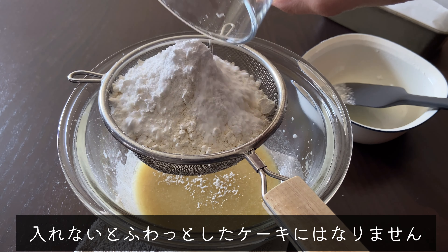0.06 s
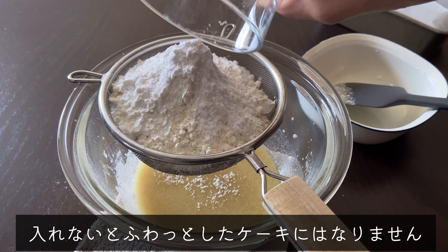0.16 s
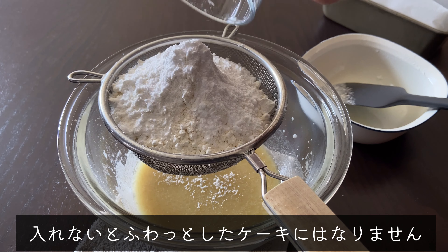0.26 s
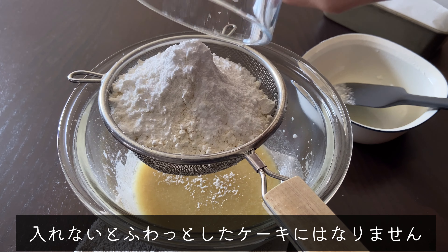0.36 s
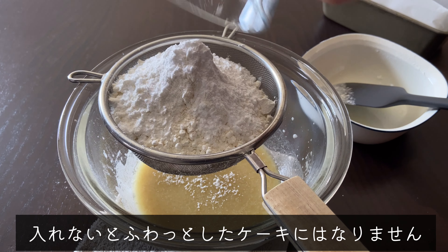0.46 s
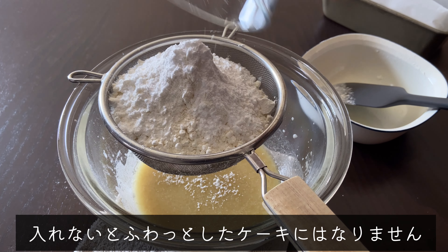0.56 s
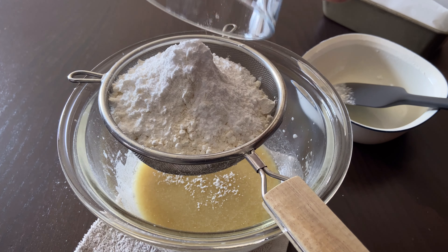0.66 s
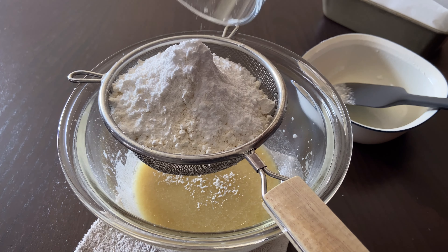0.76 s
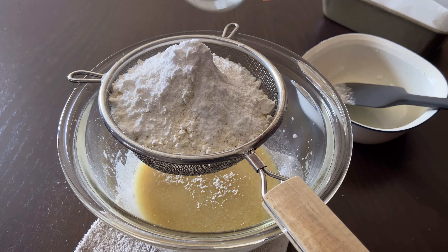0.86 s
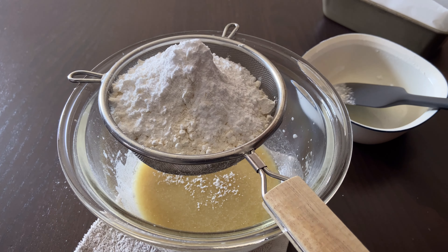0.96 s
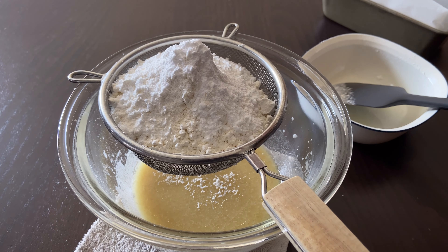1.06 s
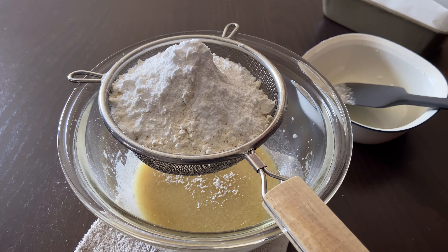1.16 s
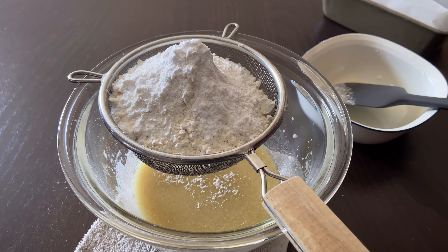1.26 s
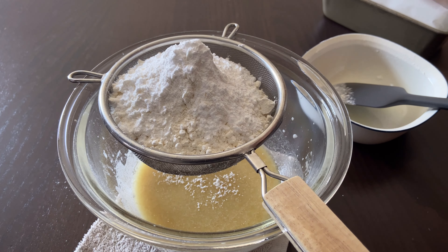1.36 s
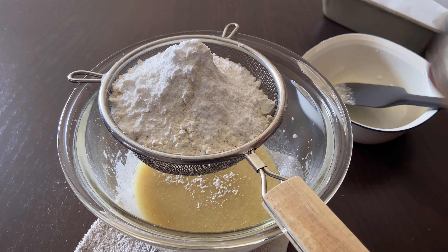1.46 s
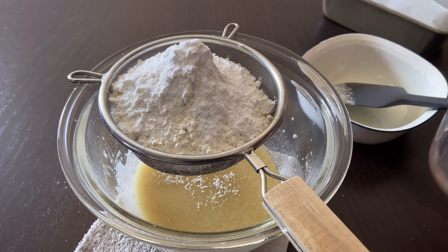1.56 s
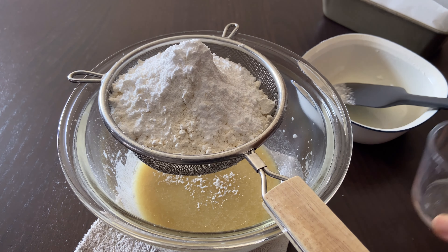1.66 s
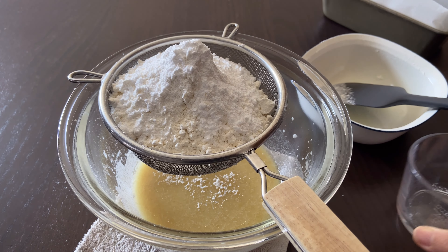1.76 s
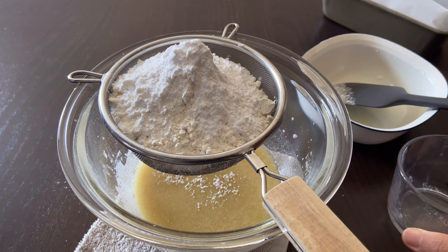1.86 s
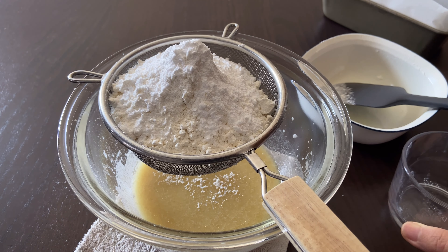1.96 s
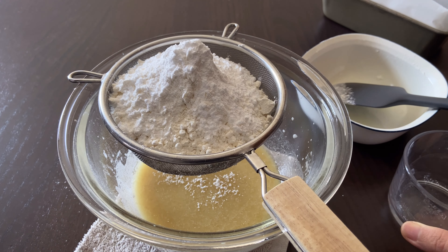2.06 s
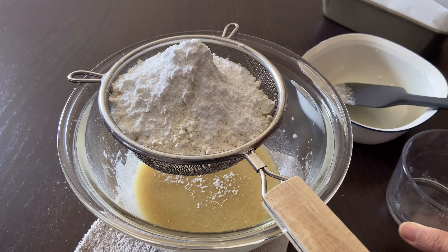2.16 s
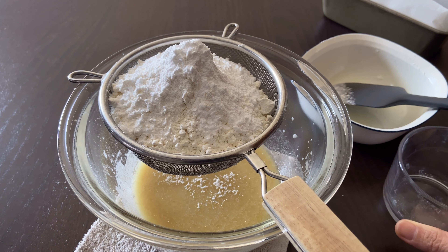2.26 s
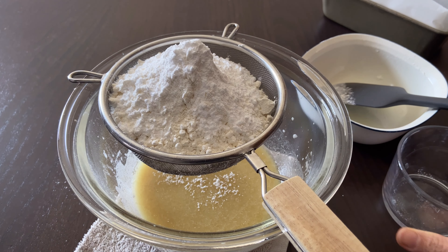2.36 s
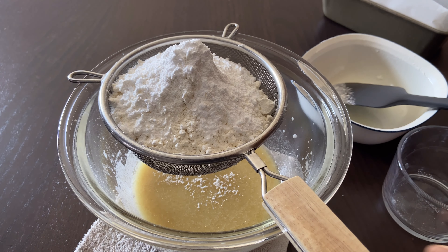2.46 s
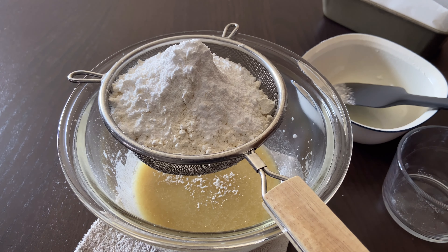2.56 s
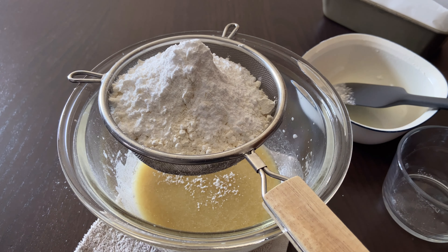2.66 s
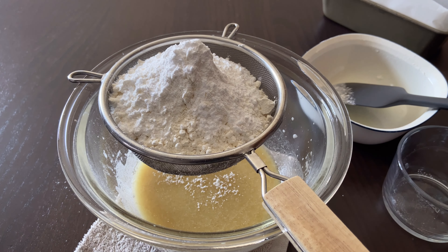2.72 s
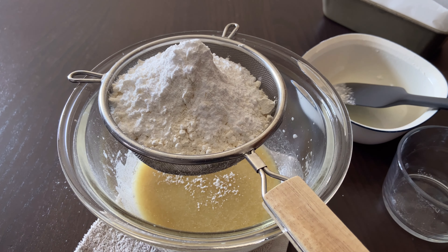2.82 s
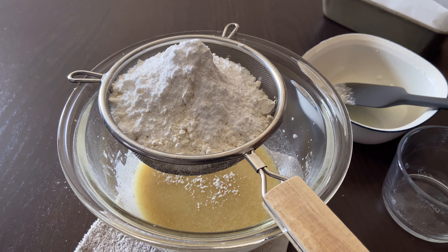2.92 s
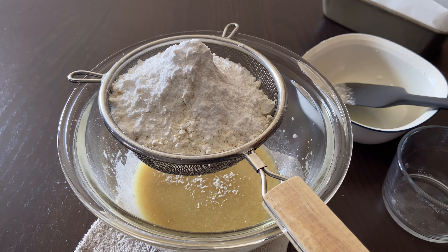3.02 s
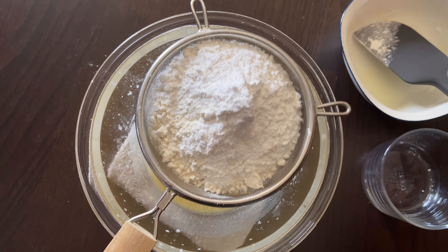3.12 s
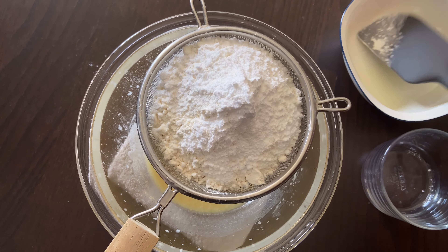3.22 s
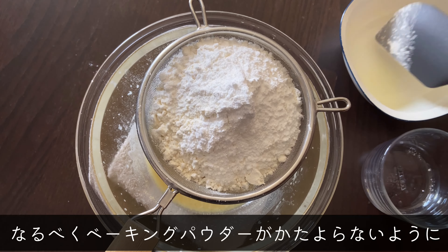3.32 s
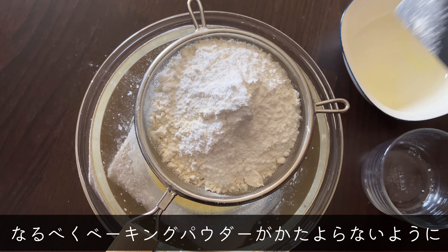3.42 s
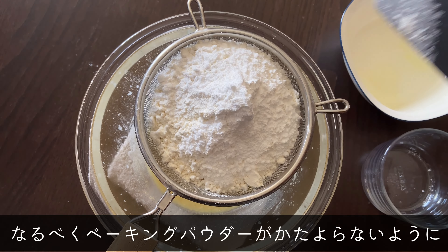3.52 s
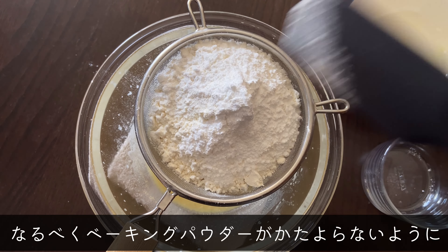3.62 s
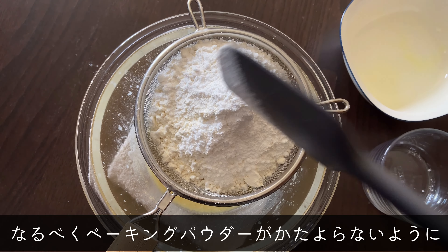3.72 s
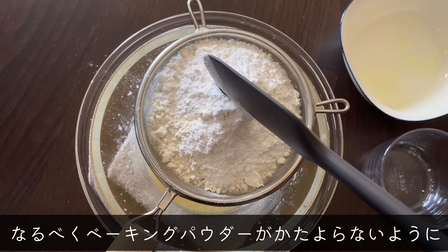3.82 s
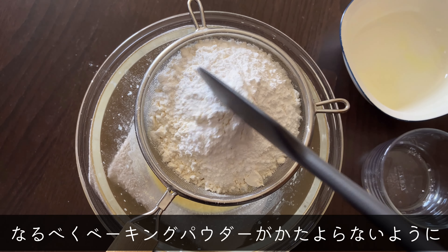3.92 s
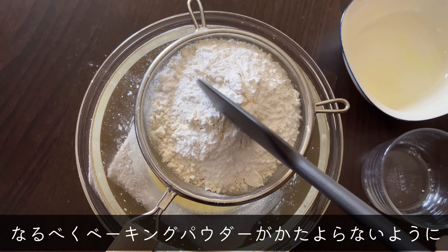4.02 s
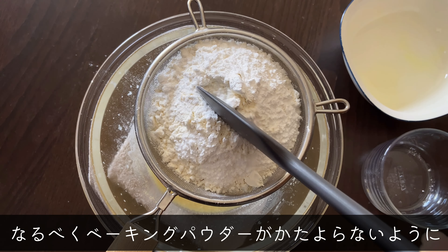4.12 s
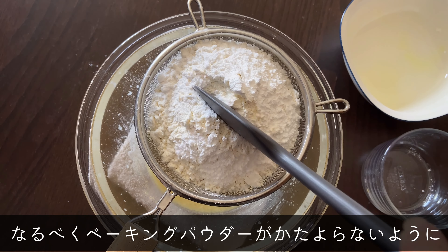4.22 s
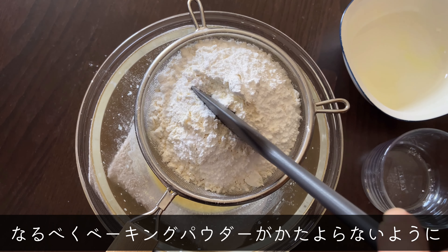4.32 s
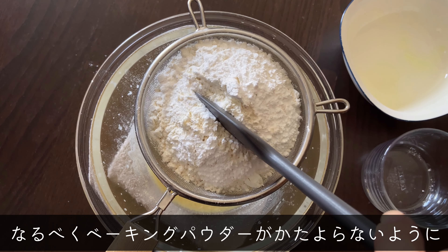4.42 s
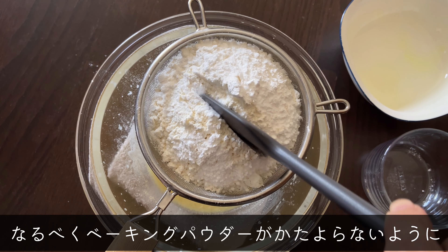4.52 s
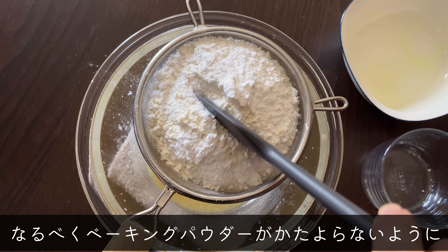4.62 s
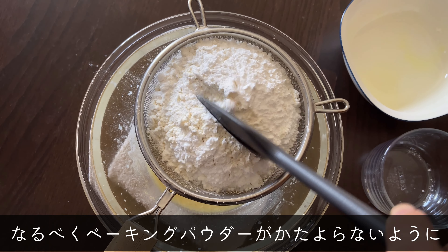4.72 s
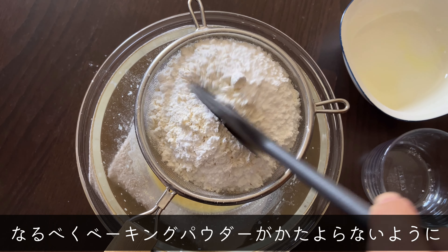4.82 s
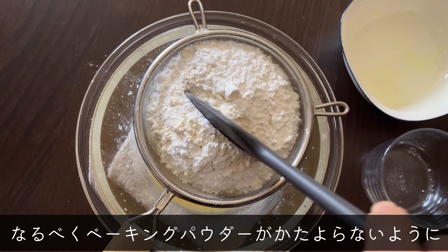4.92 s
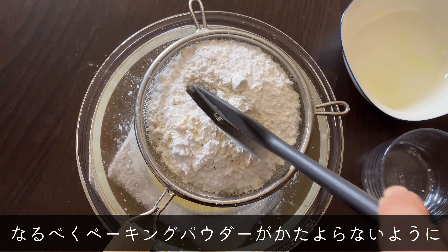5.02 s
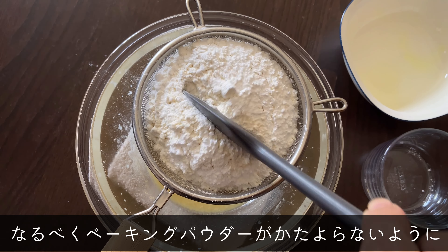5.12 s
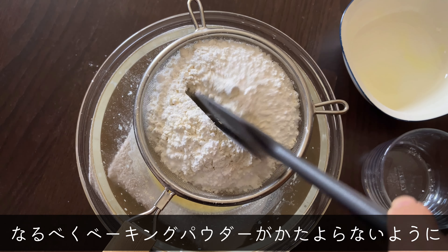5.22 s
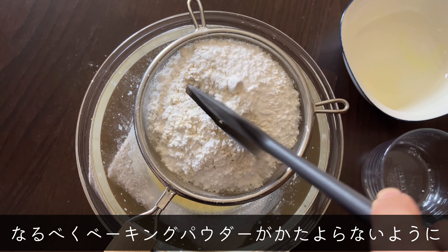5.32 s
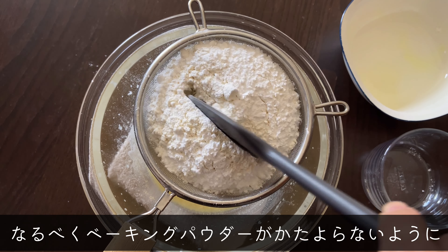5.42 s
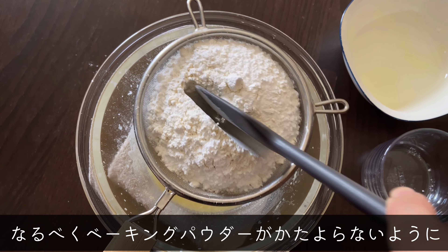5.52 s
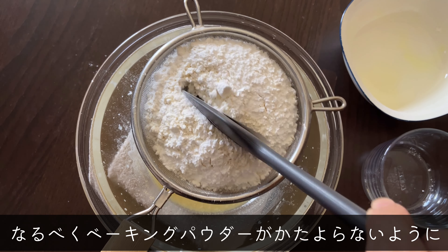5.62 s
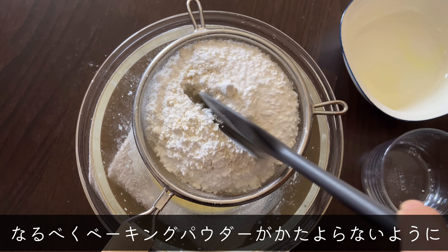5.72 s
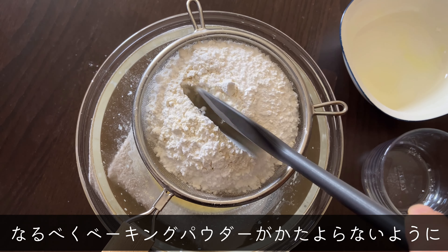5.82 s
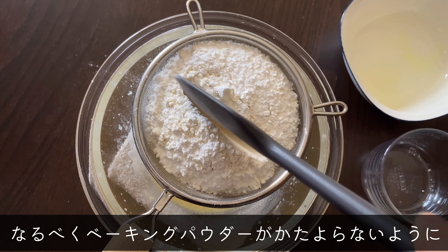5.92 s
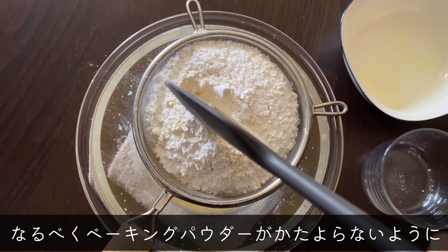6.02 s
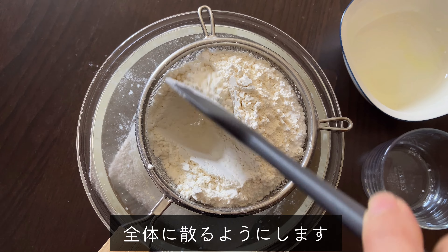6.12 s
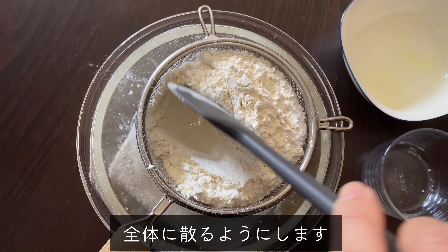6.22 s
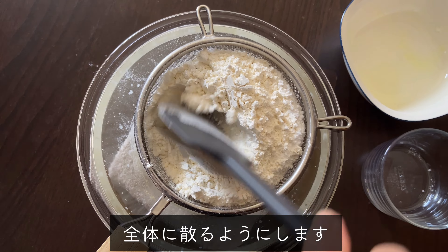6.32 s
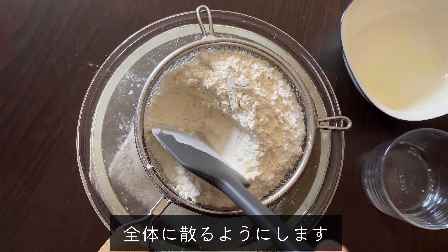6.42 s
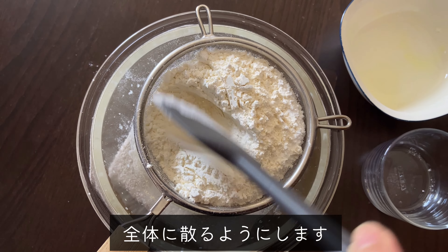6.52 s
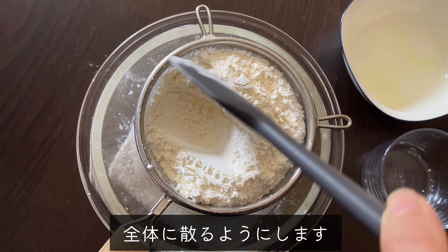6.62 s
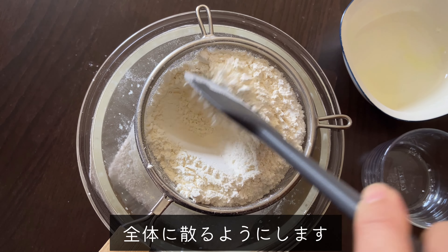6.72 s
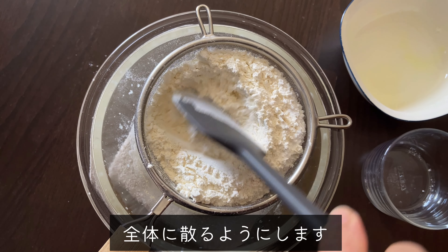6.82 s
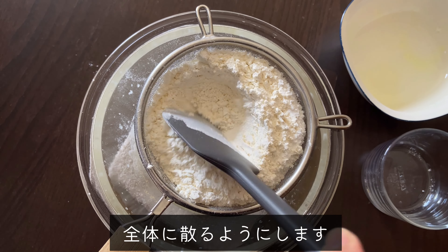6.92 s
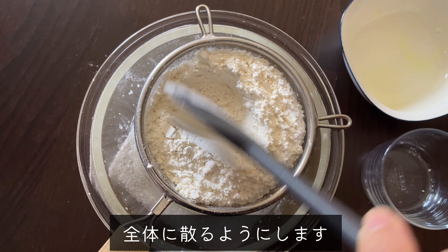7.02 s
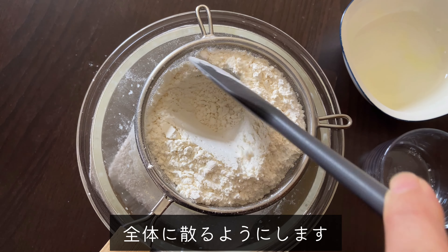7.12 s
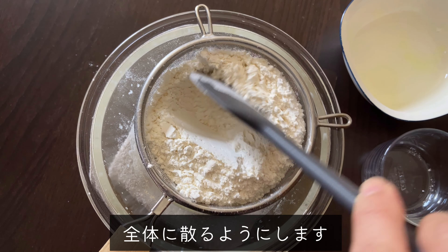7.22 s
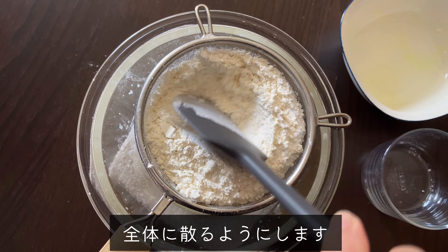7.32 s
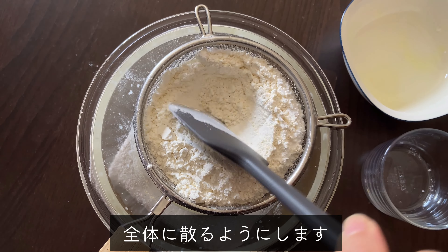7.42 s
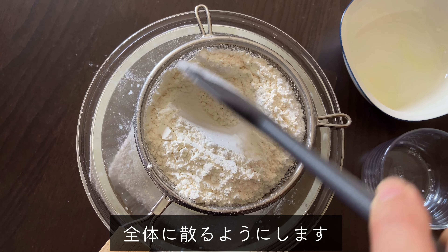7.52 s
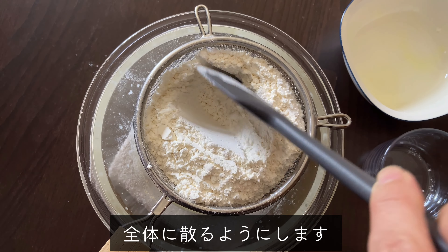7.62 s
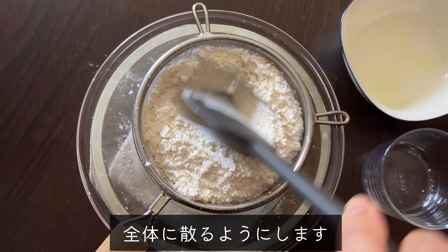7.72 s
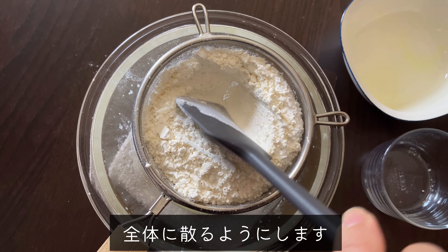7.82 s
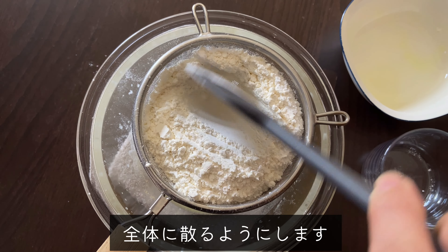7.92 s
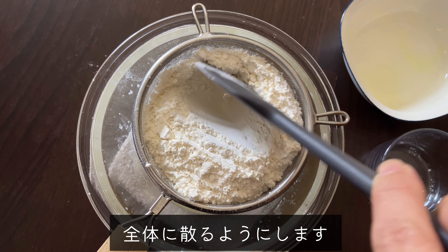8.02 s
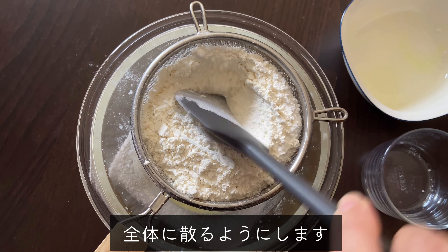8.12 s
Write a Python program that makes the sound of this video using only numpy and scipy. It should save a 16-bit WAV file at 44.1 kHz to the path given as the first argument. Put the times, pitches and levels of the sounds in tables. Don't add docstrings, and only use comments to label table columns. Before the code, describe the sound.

A quiet kitchen with steady low fridge hum and faint room rumble. A glass cup lands on a wooden table with a loud bouncing knock, then a second softer one. After a small shift in the background, flour rustles and the sieve bumps its glass bowl in dull clusters. Finally a spatula makes brief scratchy sweeps over the mesh. Close stereo microphone, short room reflections.

```python
import sys
import numpy as np
from scipy import signal
from scipy.fft import rfft, irfft, next_fast_len
from scipy.io import wavfile
from scipy.ndimage import uniform_filter1d

SR = 44100
rng = np.random.default_rng(int(sys.argv[2]) if len(sys.argv) > 2 else 0)


def magnitude_from_level(level_db):
    exponent = np.asarray(level_db, float) / 20
    return 10 ** exponent


def transcribe(u):
    v = np.clip(np.atleast_2d(u).T, -1, 1)
    q = np.round(v * 32767).astype(np.int16)
    wavfile.write(sys.argv[1], SR, q)


N = 360297
T = np.arange(N) / SR
HALVES = np.array([[.5], [-.5]])
OPPOSED = np.array([[1], [-1]])
RISE_S = .001


def rms_one(x):
    return x / np.sqrt(np.mean(x ** 2) + 1e-20)


def at_hz(points, hz):
    return np.interp(np.log(hz), np.log(np.array(points)[:, 0]), np.array(points)[:, 1])


def band(x, low_hz, high_hz):
    edges = [low_hz, min(high_hz, .45 * SR)]
    return signal.sosfilt(signal.butter(2, edges, "band", fs=SR, output="sos"), x)


def ring(clicks, hz, t60):
    r, w = magnitude_from_level(-60 / (t60 * SR)), 2 * np.pi * hz / SR
    return signal.lfilter([0, np.sin(w)], [1, -2 * r * np.cos(w), r * r], clicks + 1e-18)


def swell(rise_s, hz):
    t = T[:SR // 8]
    return t / rise_s * np.exp(1 - t / rise_s) * np.sin(2 * np.pi * hz * t)


def strike(out, s, hit):
    i = round(s * SR)
    out[:, i:i + hit.shape[-1]] += hit


def bursts(rows, sag_db_per_s=0):
    out, edge_db = np.zeros(N), 30
    for s, top_db, *lengths in rows:
        rise, hold, fall = np.maximum(lengths, 1e-4)
        end_db = top_db - sag_db_per_s * hold
        part = slice(int((s - rise) * SR), int((s + hold + fall) * SR))
        corners_s = [s - rise, s, s + hold, s + hold + fall]
        out[part] += magnitude_from_level(np.interp(T[part], corners_s, [top_db - edge_db, top_db, end_db, end_db - edge_db]))
    return out


# (frequency [Hz], left-right correlation [-1 to 1])
LIKENESS = [(60, 0.63), (95, 0.81), (150, 1), (240, 0.45), (370, 0.68), (590, -0.22), (930, -0.078),
            (1460, -0.18), (2300, 0.52), (3640, 0.15), (5740, 0.57), (9050, -0.82), (14300, 0.81)]
# (frequency [Hz], left minus right [dB])
TILT = [(60, 1.5), (180, -3), (540, -1), (1600, -3.5), (4780, -5.5), (14300, 0.5)]


def diffuse(size, shape, low_hz=22, high_hz=16000, alike=None):
    out, white = 0, rng.standard_normal((2, 2, size))
    edges = low_hz * 2 ** np.arange(0, np.log2(high_hz / low_hz) + .2, 1 / 3)
    for k, (low, high) in enumerate(zip(edges, edges[1:])):
        mid, side = band(white[k % 2], low, high)
        hz = np.sqrt(low * high)
        c = np.clip(at_hz(LIKENESS, hz) if alike is None else alike, -1, 1)
        pair = np.sqrt(1 + c) * mid + np.sqrt(1 - c) * side * OPPOSED
        out = out + shape(hz) * magnitude_from_level(at_hz(TILT, hz) * HALVES) * pair
    return out


def grains(per_s, spread_db):
    sizes = magnitude_from_level(spread_db * np.minimum(rng.exponential(1, N), 4)) * rng.choice([-1, 1], N)
    return rms_one(sizes * (rng.random(N) < per_s / SR))


def colour(x, spectrum):
    size = next_fast_len(N)
    hz = np.maximum(np.arange(size // 2 + 1) * SR / size, 1)
    return rms_one(irfft(rfft(x, size) * magnitude_from_level(at_hz(spectrum, hz)), size)[:N])


# (start [s], compressor speed [turns/s], hum phase [rad],
# hum lag of the left [rad], hum left minus right [dB])
VIEWS = [
    (0, 134.13, -.1, .59, .4),
    (3.096, 134.75, 2.2, .26, 1.8),
    (6.095, 135.275, -.4, .26, 1.7),
]


def view_index():
    return np.searchsorted(np.array(VIEWS)[:, 0], T, "right") - 1


# (frequency [Hz], level [dB rms])
HUM = [
    (99.96, -42),
    (199.92, -61.5),
]


def mains_hum():
    _, _, phase, lag, tilt_db = np.array(VIEWS)[view_index()].T
    phase = uniform_filter1d(phase, size=4)
    out = 0
    for k, (hz, level_db) in enumerate(HUM):
        tone = np.cos(2 * np.pi * hz * T + phase - HALVES * lag)
        out = out + magnitude_from_level(level_db + HALVES * tilt_db * (-1) ** k) * tone
    return np.sqrt(2) * out


# (multiple of turns, left minus right [dB], lag of the left [rad],
# level in each of the three views [dB rms])
WHINE = [(5.17, -4.5, 2.29, -68.5, -61.5, -60), (10, -1.5, 4.7, -101, -96, -85),
         (15, 1, 1.4, -84, -88.5, -92.5), (24, -3.5, 1.4, -87, -86.5, -78.5),
         (20, -7.5, 2.2, -102, -85, -83.5), (23, -5, 1.3, -91, -85, -90),
         (25, -4.5, 1.3, -101.5, -88, -93.5), (28, -6, 1.5, -104, -89.5, -100)]


def compressor_whine():
    view, out = view_index(), 0
    turns = np.array(VIEWS)[view, 1]
    wobble = signal.lfilter([1], [1, -.9999], rng.standard_normal(N)) * 0.004
    for multiple, pan_db, late, *level_db in WHINE:
        turn = 2 * np.pi * round(multiple) * turns * T + wobble * multiple / 5
        out = out + magnitude_from_level(np.array(level_db))[view] * np.cos(turn - HALVES * late) * magnitude_from_level(HALVES * pan_db)
    return np.sqrt(2) * out


# (frequency [Hz], width [Hz], level in each of the three views [dB rms])
CASING = [(499, 49, -71, -67.5, -68), (1104, 70, -80.5, -72.5, -73.5), (1830, 88, -82.5, -76.5, -79.5),
          (3280, 490, -100, -83.5, -95)]


def fan():
    view, white, out = view_index(), rng.standard_normal((2, N)), 0
    for hz, width, *level_db in CASING:
        out = out + magnitude_from_level(np.array(level_db))[view] * rms_one(band(white, hz - width / 2, hz + width / 2))
    return out


# (frequency [Hz], density [dB per Hz])
AIR = [(15, -57.5), (25, -44.5), (49, -11.5), (77, -8.5), (106, -5), (162, -17.5), (276, -23), (666, -32),
       (1000, -35), (1520, -44), (3130, -51), (7170, -57.5), (9500, -62.5), (13000, -61)]


def air():
    left, right = rms_one(diffuse(N, lambda hz: magnitude_from_level(at_hz(AIR, hz))))
    mid = signal.sosfilt(signal.cheby2(12, 30, 14100, fs=SR, output="sos"), left + right)
    side = signal.sosfilt(signal.cheby2(6, 20, 15000, fs=SR, output="sos"), left - right)
    return magnitude_from_level(-48.5) * (mid + side * OPPOSED) / 2


# (time [s], gain [dB])
GAIN = [(0, -1.5), (3.09, 0), (3.1, -8), (3.3, -8.5), (3.42, -3), (4.0, -1), (5.0, 0), (6.09, -1),
        (6.1, -1), (8.17, 0)]


def gain_control():
    return magnitude_from_level(np.interp(T, *np.transpose(GAIN)))


# (time [s], level [dB], rise [s], hold [s], fall [s])
RUBS = [(0.8, -68, .06, .005, 0.18), (1.292, -66, 0.054, .005, 0.029), (1.34, -70, .02, 0.0046, 0.041),
        (7.493, -68, .012, .004, .025), (7.617, -62, 0.014, 0.007, 0.029),
        (7.925, -65, 0.0092, 0.0055, 0.033), (2.254, -73, 0.076, 0.048, .025), (2.852, -71, 1, .005, .1),
        (2.966, -71, 0.095, .005, 0.023), (3.098, -56.5, 0.012, 0.28, .16), (3.25, -72, .25, 0.017, 0.3),
        (3.594, -61.5, .006, .004, 0.081), (3.645, -57.5, 0.004, 0.0043, 0.17),
        (3.794, -61, .005, 0.063, 0.18), (5.084, -56.5, 0.028, .002, 0.022), (5.48, -70, .01, .002, 0.03),
        (5.57, -66, 0.098, 0.0027, .03), (5.7, -69, 0.54, 0.016, .01), (8.168, -59, 0.0071, 0.0019, 0.011)]
# (time [s], level [dB], rise [s], hold [s], fall [s])
HISSES = [(0.498, -82, .06, .005, 0.23), (0.894, -79, 0.14, .005, 0.068), (1.25, -76, 0.41, 0.046, 0.19),
          (1.774, -69.5, 0.23, 0.0055, 0.069), (1.869, -74, 0.019, 0.00084, 0.0011),
          (2.254, -87, 0.14, 0.011, .13), (2.432, -74, 0.13, 0.0042, 0.14), (2.72, -77.5, .6, 0.32, 0.66),
          (3.096, -68.5, 0.004, .12, 0.21), (3.398, -72, 0.17, .003, .04), (3.634, -85.5, 0.54, .003, 0.27),
          (3.8, -77, 0.03, .02, .1), (5.062, -83, .09, 0.024, 0.03), (5.534, -68, 0.027, .003, 0.046),
          (5.6, -77, 0.038, .01, 0.27)]
# (frequency [Hz], density [dB per Hz])
SLIDE = [(180, -30), (300, 5.5), (542, 0), (684, -5), (852, -3), (1140, -4), (3500, -12), (8000, -22.5),
         (10400, -66.5), (17600, -120)]


def rustle():
    sag_db_per_s = 25.5
    body = rms_one(diffuse(N, lambda hz: magnitude_from_level(at_hz(SLIDE, hz)), low_hz=300, high_hz=9000))
    hiss = rms_one(diffuse(N, lambda hz: 1, low_hz=10500, high_hz=17000, alike=0.1))
    hiss_gain = bursts(HISSES, sag_db_per_s) + powder_gain()
    return magnitude_from_level(-1.0) * bursts(RUBS, sag_db_per_s) * body + magnitude_from_level(2.0) * hiss_gain * hiss


# (time [s], level [dB], frequency [Hz])
PINGS = [(1.341, -67, 4230), (3.592, -67, 2570), (3.596, -76, 4070), (3.646, -58.5, 3010),
         (3.662, -65, 2740), (3.793, -67, 3830), (3.795, -69, 2970), (3.806, -71, 2920), (3.825, -61, 3040),
         (3.834, -65, 3030)]


def pings():
    out = np.zeros((2, N + SR))
    for s, ping_db, hz in PINGS:
        hit = swell(0.0016, hz) + .6 * swell(.0007, 1.0 * hz) + .4 * swell(.0006, 1.3 * hz)
        strike(out, s, magnitude_from_level(ping_db + np.array([[-3], [3]])) * hit)
    return out[:, :N]


# (frequency [Hz], t60 [s])
ROOM_T60 = [(60, 0.39), (300, 0.35), (1000, 0.23), (3000, 0.22), (7000, 0.16), (15000, 0.2)]


def room(x):
    t = T[:SR // 2]
    tail = diffuse(len(t), lambda hz: magnitude_from_level(-60 * t / at_hz(ROOM_T60, hz))) * np.minimum(t / 0.0018, 1)
    return signal.fftconvolve(x[None], tail / np.sqrt(np.sum(tail ** 2) / 2), axes=1)[:, :N]


SECOND_S = 2.1

TABLE_HZ = [120, 165, 235, 308, 355, 395, 468, 534, 587, 631, 694, 753, 852, 985, 1043, 497, 1217, 1341,
            1453, 1616, 2130, 2480, 2950, 4200, 4900]
# (level [dB], t60 [s], change at the second landing [dB])
TABLE = [(-7.5, 0.68, 2.5), (-16, 0.94, -2), (-3.5, 0.17, 0), (-4.5, 0.23, -7.5), (-12, 0.097, 4.5),
         (-32, 0.43, 9), (3.5, 0.062, 0), (-3.5, 0.048, 7), (-29.5, 0.23, 2), (-18.5, 0.24, -2),
         (-3, 0.19, -18), (-7, 0.14, -3.5), (-3, 0.067, 1.2), (-11.5, 0.15, 3.5), (-14, 0.23, 3),
         (-31.5, 0.16, 16.5), (-37, 0.18, 5), (-6, 0.049, -1.5), (-21.5, 0.11, 1), (-29, 0.11, 3),
         (-39, 0.12, 3), (-26, 0.087, 4), (-33.5, 0.13, 8.5), (-48, .18, 2), (-54, .18, -3)]


def table_modes(s, at, peak_db, bright_db, size):
    out = np.zeros((2, size))
    luck_db = rng.standard_normal((len(at), len(TABLE)))
    for k, (hz, (level_db, t60, second_db)) in enumerate(zip(TABLE_HZ, TABLE)):
        hit_db = peak_db + level_db + second_db * (s > SECOND_S) + luck_db[:, k]
        clicks = np.zeros(size)
        clicks[at] = magnitude_from_level(hit_db + (bright_db + 27.5) * (hz > 2000)) * (-1) ** k
        mode = ring(clicks, hz, .5 * t60)
        lag = np.arccos(np.clip(at_hz(LIKENESS, hz), -1, 1)) * min(hz / 480, .9)
        out += [mode, magnitude_from_level(2.0) * np.roll(mode, round(lag * SR / (2 * np.pi * hz)))]
    return out


# (frequency [Hz], density [dB per Hz])
KNOCK = [(53, -35), (90, 12.5), (467, -4.5), (542, -17), (698, -3.5), (809, -12.5), (1340, -13.5),
         (1730, -32), (3130, -44), (8990, -77), (14000, -52.5)]
# (frequency [Hz], t60 [s])
KNOCK_T60 = [(100, 0.12), (500, 0.14), (1500, 0.16), (4000, 0.11), (12000, 0.11)]


def board_knock(clicks, crack):
    t, size = T[:SR // 3], clicks.shape[1]
    board = diffuse(len(t), lambda hz: magnitude_from_level(at_hz(KNOCK, hz) - 60 * t / at_hz(KNOCK_T60, hz)), low_hz=88.0)
    board = board / np.abs(board).max() * np.minimum(t / 0.0011, 1)
    low = signal.fftconvolve(band(clicks, 45, 1700), board, axes=1)[:, :size]
    high = signal.fftconvolve(band(crack, 1650, 6400), board, axes=1)[:, :size]
    snap = band(rng.standard_normal((2, len(t))), 8450, 12500) * np.exp(-t / 0.0051)
    high = high + magnitude_from_level(-39.0) * signal.fftconvolve(crack, snap, axes=1)[:, :size]
    return magnitude_from_level(-36.0) * low + magnitude_from_level(-3) * high


def base_blow(clicks, start):
    t, size, blow_s = T[:SR // 3], clicks.shape[1], .0022
    blow = magnitude_from_level(-3.5) * t / blow_s * np.exp(1 - t / blow_s) * np.sin(2 * np.pi * 610 * t)
    softer = magnitude_from_level(-7.0 * (T[start:start + size] > SECOND_S))
    push = magnitude_from_level(-20) * ring(clicks, 610, 0.04) + magnitude_from_level(-7) * ring(clicks * softer, 990, 0.024)
    return push - signal.fftconvolve(clicks, [blow, magnitude_from_level(-2.5) * np.roll(blow, 16)], axes=1)[:, :size]


# (time [s], peak [dB], brightness [dB])
CUP = [
    (1.874, -5, -27.5),
    (1.895, -11.5, -41),
    (1.904, -11.5, -39),
    (1.922, -42, -36.5),
    (1.942, -47.5, -50),
    (2.149, -12, -32),
    (2.162, -29, -33),
    (2.178, -23.5, -40),
    (1.888, -22, -40),
    (2.19, -30, -43),
]
# (time [s], level [dB], rise [s], hold [s], fall [s])
LEAD_INS = [
    (1.863, -45, .012, .009, 0.0011),
    (2.148, -39.5, 0.027, 0.00089, .001),
]


def cup():
    s, peak_db, bright_db = np.transpose(CUP)
    start, size = int(s[0] * SR) - SR // 20, SR
    at = ((s + RISE_S) * SR).astype(int) - start
    clicks, crack = np.zeros((2, 1, size))
    clicks[0, at] = magnitude_from_level(peak_db)
    crack[0, at] = magnitude_from_level(peak_db + bright_db + 36)
    soft = table_modes(s, at, peak_db, bright_db, size) + base_blow(clicks, start)
    soft = signal.sosfilt(signal.butter(3, 2500, fs=SR, output="sos"), soft)
    knock = band(soft, 120, 15000) + board_knock(clicks, crack)
    lead_in = band(rng.standard_normal((2, size)), 350, 1200) * bursts(LEAD_INS)[start:start + size]
    return np.pad(knock + magnitude_from_level(16.0) * lead_in, [(0, 0), (start, N - start - size)])


# (time [s], level [dB], frequency [Hz],
# top level [dB], left minus right [dB])
TICKS = [(3.0936, -76, 1720, -15.5, -9), (3.3894, -71, 1820, -17, -13), (3.6425, -67, 2200, -5, -4),
         (3.7925, -66, 3700, 2.5, -8), (3.825, -69, 3000, 2, -8), (3.847, -76, 3200, -2, -8),
         (5.328, -71, 1300, -30, -6), (5.333, -62, 1300, -30, -7), (5.339, -61, 1300, -30, -6),
         (8.078, -49, 1880, -16, -12), (4.9776, -45, 1550, -30, -9), (5.081, -55, 2670, -22, -13),
         (5.085, -55, 2580, -22, -8), (5.448, -47, 2740, -21, -13), (5.4538, -46.5, 1680, -21, 1),
         (5.47, -42, 2680, -10.5, -9.5), (5.5649, -45, 1450, -34, -8)]


def ticks():
    out, t = np.zeros((2, N + SR)), T[:SR // 8]
    for s, tick_db, hz, top_db, pan_db in TICKS:
        top = np.exp(-t / 0.00087) * band(rng.standard_normal((2, len(t))), 3500, 8500)
        top = top + 0.39 * swell(0.00044, 4900)
        hit = swell(0.00037, hz) + 0.72 * swell(0.00048, 2820) + 0.43 * swell(0.00072, 1760)
        strike(out, s + RISE_S, magnitude_from_level(tick_db + pan_db * HALVES) * (hit + magnitude_from_level(top_db + 12.0) * top))
    return out[:, :N]


# (time [s], level [dB], bowl frequency [Hz], rim level [dB])
THUDS = [(3.117, -47, 300, -2), (4.824, -56, 240, 5), (4.872, -37, 228, -7.5), (4.961, -36, 317, -12),
         (4.98, -29, 239, -15), (4.988, -47, 248, 3), (4.993, -44, 250, -20), (5.082, -50, 243, 7),
         (5.087, -53, 241, 8.5), (5.089, -37.5, 233, -16), (5.22, -44, 230, -7), (5.328, -61, 261, 16),
         (5.334, -67, 261, 8), (5.097, -58, 250, 6), (5.4494, -30.5, 336, -5), (5.455, -30.5, 338, -4),
         (5.46, -41, 340, -22), (5.471, -28, 300, -5.5), (5.476, -42, 300, -11), (5.566, -47, 297, 10),
         (5.579, -37, 300, -3), (5.582, -32.5, 247, -26), (5.7, -39, 234, -7), (7.931, -46, 227, -18),
         (8.02, -60, 248, 10)]


def thuds():
    out = np.zeros((2, N + SR))
    for s, thud_db, hz, rim_db in THUDS:
        hit = swell(0.0018, hz) + magnitude_from_level(rim_db) * (swell(0.0012, 644) + 0.041 * swell(0.00025, 560))
        strike(out, s + RISE_S, magnitude_from_level(thud_db + np.array([[-1.5], [1.5]])) * hit)
    return out[:, :N]


# (time [s], level [dB])
SQUEAKS = [(3.128, -69), (4.57, -75), (4.694, -78), (4.858, -80), (4.9, -85), (5.07, -71), (5.144, -78),
           (5.532, -64), (5.642, -73.5), (6.262, -81)]
WIRE_HZ = (9720, 10700, 12600)


def squeak():
    rise_s, fall_s = 0.037, 0.033
    slips = rng.standard_normal(N)
    wire = rms_one(ring(ring(slips, WIRE_HZ[0], 0.0048), WIRE_HZ[0], 0.0026))
    over = magnitude_from_level(-6) * rms_one(ring(slips, WIRE_HZ[1], .008))
    over = over + magnitude_from_level(-15) * rms_one(ring(slips, WIRE_HZ[2], .012))
    opposed = magnitude_from_level(9.5) * np.roll(wire, 1) * OPPOSED
    return bursts([(s, db, rise_s, 0, fall_s) for s, db in SQUEAKS]) * (wire + opposed + over)


# (time [s], level [dB], frequency [Hz])
BUMPS = [
    (5.602, -44, 80),
    (5.723, -38.5, 76),
    (7.649, -37, 73.4),
    (8.018, -35.5, 67.4),
    (8.111, -44, 64.4),
]


def bumps():
    out = np.zeros((2, N + SR))
    for s, bump_db, hz in BUMPS:
        strike(out, s, magnitude_from_level(bump_db) * swell(0.017, hz))
    return out[:, :N]


# (start [s], length [s], rim level [dB], bowl level [dB], mesh level [dB])
SWEEPS = [
    (6.288, 0.063, -59, -73, -59.5),
    (6.797, 0.027, -55.5, -59, -70),
    (7.246, 0.048, -52, -49.5, -62.5),
    (7.681, 0.038, -47, -51, -56),
    (8.064, 0.026, -49.5, -50.5, -49),
]


def stroke_gain(levels_db):
    bite = [(s, db, 0.014, length, 0.03) for (s, length, *_), db in zip(SWEEPS, levels_db)]
    skirt = [(s, db - 17.5, 0.068, length, .2) for s, db, _, length, _ in bite]
    return bursts(bite, sag_db_per_s=36.5) + bursts(skirt)


# (from time [s], rim frequency [Hz], bowl frequency [Hz],
# share of chatter [0-1], powder level [dB])
GRIP = [(6.2, 725, 300, 0.4, -72), (6.7, 660, 300, 0.97, -77), (7.1, 660, 216.2, 0.06, -75.5),
        (7.5, 580, 265, 0.54, -71), (7.9, 736, 333, 0.6, -66.5)]


def rim_and_bowl():
    start = int(GRIP[0][0] * SR)
    slips = grains(per_s=1400, spread_db=2.5)[start:]
    stroke = np.searchsorted(np.array(GRIP)[:, 0], T[start:], "right") - 1
    rim, bowl = np.zeros((2, N))
    for k, (_, rim_hz, bowl_hz, chatter, _) in enumerate(GRIP):
        broad = chatter * rms_one(band(slips, 440, 1120))
        rim[start:] += (stroke == k) * (rms_one(ring(ring(slips, rim_hz, 0.017), rim_hz, 0.0064)) + broad)
        bowl[start:] += (stroke == k) * rms_one(ring(ring(slips, bowl_hz, 0.23), bowl_hz, 0.0073))
    _, _, rim_db, bowl_db, _ = np.transpose(SWEEPS)
    return stroke_gain(rim_db) * rim + stroke_gain(bowl_db) * bowl


def powder_gain():
    lag_s = 0.0086
    return np.roll(stroke_gain(np.array(GRIP)[:, 4]), round(lag_s * SR))


def sift():
    return magnitude_from_level(3.5) * powder_gain() * rms_one(band(rng.standard_normal((2, N)), 2200, 6400))


# (frequency [Hz], density [dB per Hz])
MESH = [(530, -5.5), (900, -5), (1400, -11.5), (1890, -8.5), (2900, -12), (3640, -17), (4420, -41.5),
        (7040, -22), (8000, -36), (10400, -58), (17600, -120)]


def mesh():
    shared, apart = (colour(grains(per_s=5000, spread_db=3.0), MESH) for _ in range(2))
    shared = shared + 0.19 * rms_one(band(shared, 1590, 2500))
    return stroke_gain(np.transpose(SWEEPS)[4]) * (shared + 0.96 * apart * OPPOSED)


# (first slip [s], length [s], rate at start [slips/s], rate at end [slips/s], level [dB])
JUDDER = [
    (6.8004, 0.036, 82, 115, -44.5),
    (7.2493, 0.042, 199, 213, -45.5),
    (7.681, 0.034, 245, 290, -34.5),
    (8.0615, .038, 334, 405, -41),
]
# (rim frequency [Hz], rim t60 [s], wire frequency [Hz], wire level [dB],
# bowl level [dB], loss at both ends [dB])
JUDDER_RING = [(686, 0.016, 1260, -3.5, -21, 2), (660, 0.013, 1700, -5.5, 2, -2),
               (620, 0.02, 1930, -8, -6.5, 3.5), (1100, 0.0055, 2080, -2, -12, 4)]


def judder():
    jitter, spread_db = 0.04, 3.3
    out, t = np.zeros(N + SR), T[:SR // 8]
    for (s, length, first, last, top_db), ringing in zip(JUDDER, JUDDER_RING):
        rim_hz, rim_t60, wire_hz, wire_db, bowl_db, fade_db = ringing
        luck, clicks = rng.standard_normal((24, 2)), np.zeros(SR // 8)
        count = first * t + (last - first) * t ** 2 / (2 * length)
        when = np.interp(np.arange(24), count, t) + jitter * np.abs(luck[:, 0]) / first
        keep = when < length
        slip_db = top_db + spread_db * luck[:, 1] - fade_db * (2 * when / length - 1) ** 2
        clicks[(when[keep] * SR).astype(int)] = magnitude_from_level(slip_db)[keep]
        wires = ring(clicks, wire_hz, 0.0054) - 0.65 * ring(clicks, 0.71 * wire_hz, .012)
        wires = wires + 0.12 * ring(clicks, 1.9 * wire_hz, 0.0042)
        bowl = ring(clicks, (first + last) / 2, 0.033)
        out[round(s * SR):][:len(t)] += ring(clicks, rim_hz, rim_t60) + magnitude_from_level(wire_db) * wires + magnitude_from_level(bowl_db) * bowl
    return out[:N]


# (time [s], frequency [Hz], level [dB])
SING = [
    (8.062, 667, -46),
    (8.074, 653, -36.5),
    (8.084, 750, -31),
    (8.091, 785, -38),
    (8.099, 776, -51),
]


def sing():
    s, hz, db = np.transpose(SING)
    turns = np.cumsum(np.interp(T, s, hz) * (T > s[0])) / SR
    return magnitude_from_level(np.interp(T, s, db, -150, -150)) * np.sin(2 * np.pi * turns)


def scene():
    knock = cup()
    blade = rim_and_bowl() + sift() + mesh() + judder() + sing()
    taps = pings() + ticks() + thuds() + bumps()
    dull_taps = taps - 0.35 * band(taps, 2200, 3500)
    sent = magnitude_from_level(-11.0) * knock[0] + magnitude_from_level(-11.5) * blade.mean(axis=0) + magnitude_from_level(-10) * dull_taps.mean(axis=0)
    wet = room(band(sent, 280, 13000))
    near = magnitude_from_level(-7) * knock + blade * magnitude_from_level([[-3], [.3]]) + taps
    background = gain_control() * (mains_hum() + compressor_whine() + fan() + air())
    return background + near + wet + squeak() + rustle()


def low_pass(x):
    return signal.sosfilt(signal.butter(12, 14880, fs=SR, output="sos"), x)


def record(dry):
    def steep(x, hz, kind):
        return signal.sosfilt(signal.cheby2(10, 32, hz, kind, fs=SR, output="sos"), x)

    dry = .75 * np.tanh(dry / .75)
    mid = steep(steep(dry[0] + dry[1], [8450, 9420], "bandstop"), 14800, "low")
    side = steep(steep(dry[0] - dry[1], [11700, 13000], "bandstop"), 16000, "low")
    return low_pass((mid + side * OPPOSED) / 2)


dry = scene()
out = record(dry)
transcribe(out)
```